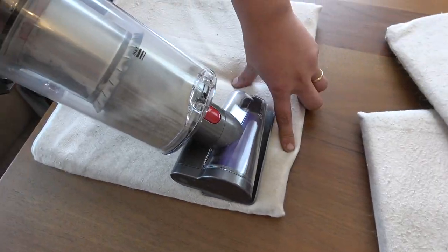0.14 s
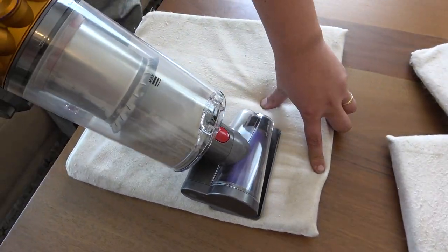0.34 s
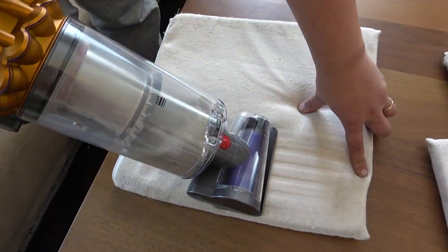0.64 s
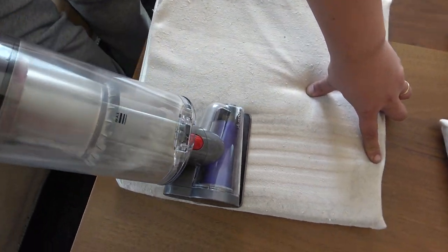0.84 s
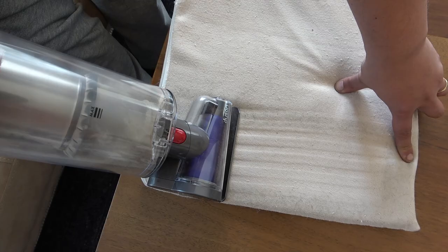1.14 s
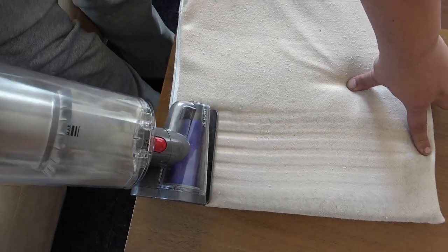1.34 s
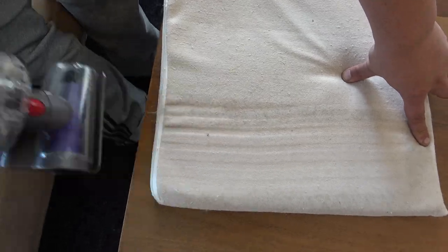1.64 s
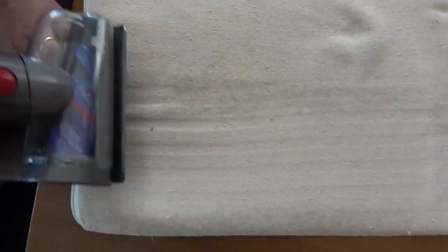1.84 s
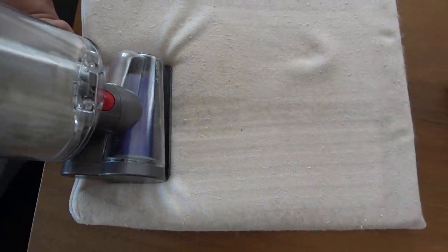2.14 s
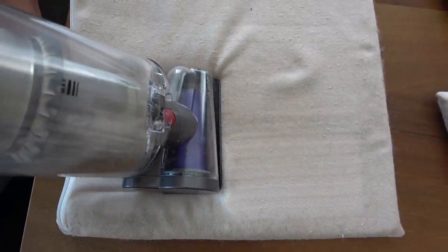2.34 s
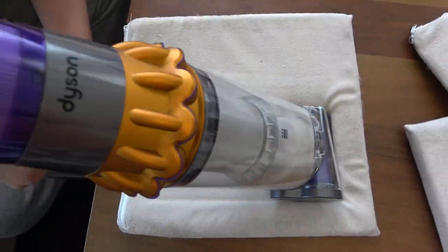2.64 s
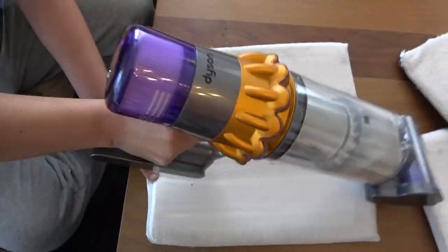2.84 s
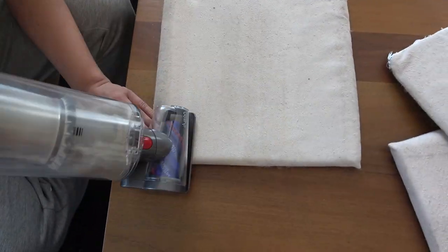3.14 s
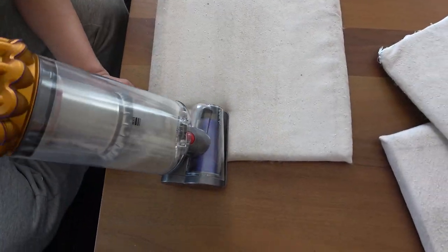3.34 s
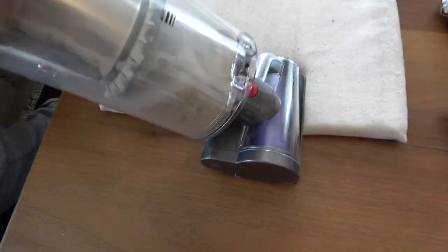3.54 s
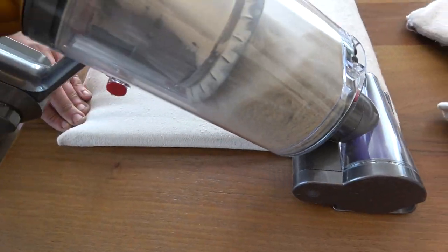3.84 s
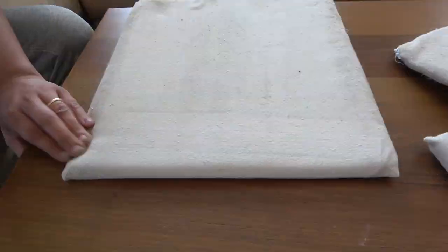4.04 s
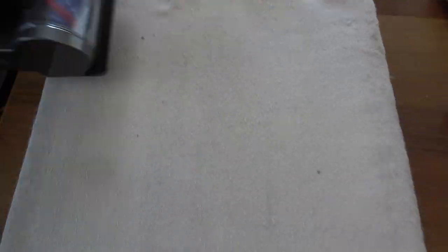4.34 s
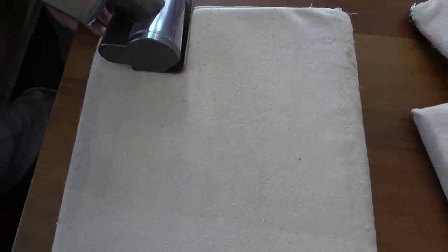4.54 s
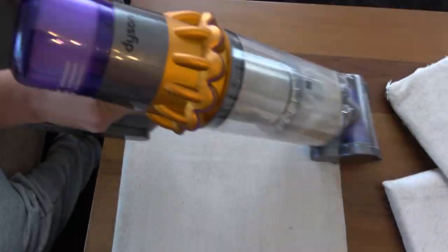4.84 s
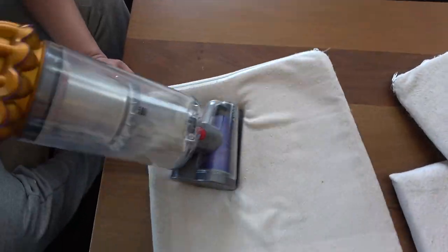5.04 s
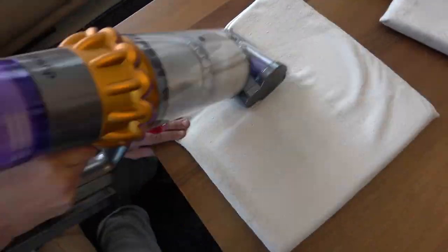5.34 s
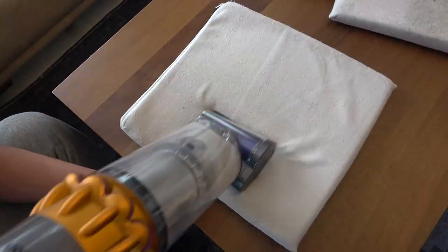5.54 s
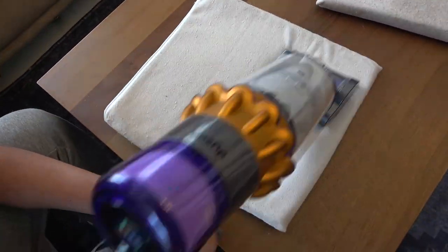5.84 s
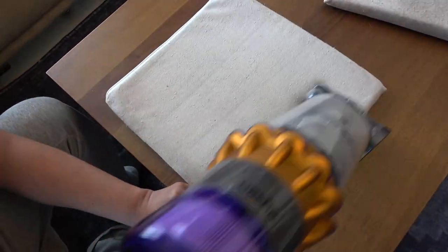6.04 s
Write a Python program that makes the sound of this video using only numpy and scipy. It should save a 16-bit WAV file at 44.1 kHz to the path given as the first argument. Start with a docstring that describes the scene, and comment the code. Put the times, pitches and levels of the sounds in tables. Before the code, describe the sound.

A cordless vacuum with a whining motorised brush drags over a cushion, cutting out and restarting three times, then works in short hissing strokes.

```python
"""A cordless vacuum with a small motorised brush head is drawn over a cushion on a table.
It is already running and makes a long drag, stops with a hollow ping, and starts again for a second long drag.
The second and third pulls of the trigger end in a ping too; the fourth brings six short strokes up to the end.
Air is coloured noise, hissing up as the head's seal opens; the fan whistle and brush whine are sine tones.
Ticks sound around the starts and stops, and two of grit during the second drag.
The brush hums faintly as it spins down, and a quiet room lies beneath."""
import sys
import numpy as np
from scipy import signal
from scipy.fft import rfft, irfft
from scipy.io import wavfile

SR = 44100
rng = np.random.default_rng(int(sys.argv[2]) if len(sys.argv) > 2 else 0)


def put_to_file(sound):
    """Save the sound as 16-bit audio at rate SR, in the file named by the first command-line argument."""
    columns = np.atleast_2d(sound).T  # one column per channel
    safe = np.clip(columns, -1, 1)
    whole_steps = np.round(safe * 32767)
    wavfile.write(sys.argv[1], SR, whole_steps.astype(np.int16))


N = 273420
TIME = np.arange(N) / SR
HZ = np.maximum(np.arange(N // 2 + 1) * SR / N, 1)
CUTOFF_HZ = 15780


def from_db(db):
    """Turn decibels into a gain."""
    return 10 ** (np.asarray(db) / 20)


def rms_one(x):
    """Scale a sound to an rms of 1."""
    return x / np.sqrt(np.mean(x ** 2) + 1e-20)


def in_time(rows):
    """Draw straight lines between (time, value) points, at every sample."""
    time_s, value = np.transpose(rows)
    return np.interp(TIME, time_s, value)


def by_hz(points):
    """Draw lines between (frequency, value) points, at every frequency bin."""
    hz, value = np.transpose(points)
    return np.interp(np.log(HZ), np.log(hz), value)


def drift(rate_hz):
    """Slow random wandering with an rms of 1, made by filtering noise."""
    spectrum = rfft(rng.standard_normal(N))
    return rms_one(irfft(spectrum / (1 + (HZ / rate_hz) ** 2), N))


def along_path(start_s, end_s):
    """Go from 0 at the start of an event to 1 at its end."""
    return np.clip((TIME - start_s) / (end_s - start_s), 0, 1)


def angle_of(hz):
    """Add up a changing frequency into the angle of a sine."""
    return 2 * np.pi * np.cumsum(hz) / SR


def bump(at_s, half_s):
    """A smooth swell of height 1."""
    return np.exp(-((TIME - at_s) / half_s) ** 2)


def pan(db):
    """Left and right gains; positive dB leans to the left."""
    return from_db(np.array([db, -db]) / 2)


# how alike noise is in the two ears: pitch_hz, likeness (0-1)
EAR_LIKENESS = [(60, .8), (300, .84), (1200, .97), (2800, .97), (4500, .91), (15000, .9)]


def stereo_noise(gain):
    """Coloured noise, nearly alike in both ears, with an rms of 1."""
    alike = np.clip(by_hz(EAR_LIKENESS), 0, 1)
    mid, side = rfft(rng.standard_normal((2, N)))
    shared = np.sqrt(1 + alike) * mid
    opposed = np.sqrt(1 - alike) * side * [[1], [-1]]
    return rms_one(irfft(gain * (shared + opposed), N))


# pulls of the trigger: on_s, off_s
TRIGGER_PULLS = [(-0.1, 1.727), (1.947, 2.921), (3.211, 4.026), (4.409, 6.3)]
START_S = .0042


def power(rise_s, brake_db_per_s):
    """The fan is up within milliseconds of a pull and is braked hard on release."""
    total = 0
    for on_s, off_s in TRIGGER_PULLS:
        start = (1 + np.tanh((TIME - on_s) / rise_s)) / 2
        brake = from_db(-brake_db_per_s * np.maximum(TIME - off_s, 0))
        total = total + start * brake
    return total


CONTACT_S = .011  # the head meets or leaves the cloth within about this time


def on_cloth(lands_s, lifts_s):
    """1 while the head lies on the cloth, 0 while it is in the air."""
    return (np.tanh((TIME - lands_s) / CONTACT_S) - np.tanh((TIME - lifts_s) / CONTACT_S)) / 2


# strokes on the cloth (where one runs into the next the head stays down); levels are before later changes:
# lands_s, lifts_s, seal (0-1), mid_speed (turns per s), slower_at_ends (turns per s; negative is faster),
# roar_db (body), rush_db (intake), fizz_db (exhaust), hum_db (motor), mesh_db (gears), whine_db (gears)
CLOTH_STROKES = [(-0.1, 0.33, 0.7, 428, -6, -39.5, -31, -35, -52, -32.5, -28.5),
                 (0.33, 0.8, .56, 428, 0, -40.3, -33, -33.5, -52.5, -31, -30),
                 (0.8, 1.594, 0.36, 428, 0, -37.5, -34.5, -35.3, -54.5, -27, -31),
                 (1.62, 1.755, 0.11, 488, 4, -33.5, -30.5, -28, -56, -43, -42.5),
                 (2.008, 2.085, 0.3, 455, 0, -37, -28.5, -31.5, -53, -44, -36.5),
                 (2.085, 2.55, .84, 430, -2, -42, -35.8, -34, -57, -37.5, -33.5),
                 (2.55, 2.85, 1.0, 440, 1.5, -41.5, -36, -33.5, -60, -30, -34),
                 (3.275, 3.935, 0.35, 471, 4, -35, -23.5, -28.5, -54.5, -35, -37),
                 (3.935, 4.06, 0, 376, -20, -37.5, -25, -26, -56.5, -52, -38),
                 (4.458, 4.875, 0.17, 467, 3, -39.5, -28, -28.3, -51, -50, -30),
                 (5.003, 5.22, 0.83, 445, 50, -40, -34, -33, -53.5, -33, -32.5),
                 (5.351, 5.462, .8, 460, 9, -41.5, -33, -32, -61, -32, -34),
                 (5.575, 5.695, 0.93, 454, 26, -39.7, -35.5, -30, -51, -33, -33.5),
                 (5.815, 5.925, 0.88, 448, 36, -39, -33.5, -31.3, -53.5, -28, -32),
                 (6.0, 6.144, 0.13, 466, 0, -35, -23.5, -28.5, -54.5, -31.5, -34)]
# head in the air, same levels: roar_db, rush_db, fizz_db, hum_db, mesh_db, whine_db
OPEN_HEAD_DB = [-38, -30.5, -27.5, -54.5, -52, -36.5]


def head():
    """Each stroke holds its own seal and levels; between strokes they return to those of the open head."""
    free = np.array([0, *OPEN_HEAD_DB])
    contacts = np.array([on_cloth(lands_s, lifts_s) for lands_s, lifts_s, *_ in CLOTH_STROKES])
    held = np.array([[seal, *levels] for _, _, seal, _, _, *levels in CLOTH_STROKES])
    return free[:, None] + (held - free).T @ contacts


# what a gust before a landing adds: roar_db, rush_db, hiss_db, fizz_db
LANDING_GUST_DB = [0.5, 3.6, 11.3, 0.46]
# what a gust after a lift adds: roar_db, rush_db, hiss_db, fizz_db
LIFT_GUST_DB = [3.7, 3.02, 8.1, 3.5]
# what the overshoot of air on each pull adds: roar_db, rush_db, hiss_db, fizz_db
PULL_SURGE_DB = [3.5, 7, 0, -1.5]
SURGE_S = 0.058  # the surge dies away over this time


def airflow(seal, roar_db, rush_db, fizz_db):
    """Air surges on each pull and squeezes through the narrow gap around landings and lifts."""
    hiss_db = -32.5 - 6 * seal  # the lip of the head hisses less when sealed
    steady = np.array([roar_db, rush_db, hiss_db, fizz_db])
    surge, landing, lifting, contact = 0, 0, 0, 0
    for on_s, _ in TRIGGER_PULLS:
        surge = surge + (TIME > on_s - START_S) * np.exp(-np.abs(TIME - on_s) / SURGE_S)
    for lands_s, lifts_s, tight, *_ in CLOTH_STROKES:
        contact = contact + on_cloth(lands_s, lifts_s)
        # a tighter seal gives a stronger landing gust
        landing = landing + np.sqrt(abs(tight)) * bump(lands_s - 0.035, half_s=0.033)
        lifting = lifting + bump(lifts_s + 0.014, half_s=0.017)
    gusts = np.outer(LANDING_GUST_DB, landing) + np.outer(LIFT_GUST_DB, lifting)
    return steady + np.outer(PULL_SURGE_DB, surge) + (1 - contact) * gusts


# broad colour of the air noise: pitch_hz, level_db (per Hz, relative)
AIR_SPECTRUM = [(30, -31.5), (100, -30), (250, -27), (450, -19.5), (680, -21), (1100, -8), (2200, -0.5),
                (3600, -4.5), (4600, 4), (6500, 4), (9500, 0), (12000, -0.5), (15500, -2)]
# hollows of head and bin that colour the air: pitch_hz, width_hz, boost_db
AIR_CAVITIES = [(576.7, 14, 14.5), (804, 104, 7), (1337, 41, 9), (1725, 53, 8), (3165, 50, 3.5),
                (4380, 200, -1)]


def air(flow_db, flutter_db, table_echo, echo_s):
    """Turbulence is noise in five bands, coloured by the cavities it passes and echoed off the table."""
    colour_db = by_hz(AIR_SPECTRUM)
    for hz, width_hz, boost_db in AIR_CAVITIES:
        colour_db = colour_db + boost_db / (1 + (2 * (HZ - hz) / width_hz) ** 2)
    colour = from_db(colour_db)
    roar_db, rush_db, hiss_db, fizz_db = flow_db
    # the upper part of the roar grows with the rush at the intake
    upper_roar_db = roar_db - 2.5 + 0.13 * (rush_db - roar_db - 10.0)
    levels = [roar_db - 3.5, upper_roar_db, rush_db, hiss_db, fizz_db]
    edges_hz = [1, 2100, 3800, 7300, 10300, 20000]
    leans_db = [0, 0, 0, 0, 1]  # the exhaust blows to the left
    out = 0
    for low, high, level_db, lean_db in zip(edges_hz, edges_hz[1:], levels, leans_db):
        walls = (1 + (low / HZ) ** 16) * (1 + (HZ / high) ** 16) * (1 + (HZ / CUTOFF_HZ) ** 80)
        noise = stereo_noise(colour * walls ** -.5)
        out = out + from_db(level_db + flutter_db * drift(29)) * noise * pan(lean_db)[:, None]
    # the delay of the table echo wanders
    late = TIME - echo_s * (1 + 0.11 * drift(1.27))
    return out + table_echo * np.array([np.interp(late, TIME, side) for side in out])


# hisses and howls of air at the gap, and two rough motor tones of the brush (near 1.6 and 3.7 kHz),
# level before the trim: start_s, end_s, start_hz, end_hz, width_hz, level_db
ROUGH_BANDS = [(1.618, 1.7, 8200, 9080, 900, -24.5), (1.66, 1.752, 4260, 4950, 600, -29),
               (1.933, 2.072, 6160, 4990, 1500, -29.5), (1.947, 2.955, 4620, 4715, 400, -37.5),
               (3.192, 3.378, 8220, 7900, 1600, -25), (3.4, 4.049, 3896, 3108, 910, -36.5),
               (3.449, 4.049, 6615, 6320, 1200, -30), (3.969, 4.004, 1490, 1690, 59.6, -36.5),
               (4.527, 4.784, 3720, 3670, 70, -40), (4.872, 4.92, 8500, 8500, 1600, -27),
               (4.924, 5.008, 7110, 8880, 1500, -28.5), (5.275, 5.355, 7500, 8200, 2500, -26.5),
               (5.766, 5.826, 10540, 8800, 1400, -26.5), (6.14, 6.222, 8020, 10420, 1400, -26)]


def howls_and_rough_tones(trim_db):
    """Narrow bands of noise, most of them gliding: air at the gap, and two rough motor tones of the brush."""
    out = np.zeros((2, N))
    for start_s, end_s, start_hz, end_hz, width_hz, level_db in ROUGH_BANDS:
        along = along_path(start_s, end_s)
        low_pass = signal.butter(2, width_hz / 2, fs=SR, output="sos")
        slow_noise = signal.sosfilt(low_pass, rng.standard_normal((2, N)))
        # slow noise riding on a tone becomes a narrow band around it
        phase = angle_of(start_hz + (end_hz - start_hz) * along)
        band = rms_one(slow_noise[0] * np.cos(phase) + slow_noise[1] * np.sin(phase))
        out += from_db(level_db + trim_db) * np.sqrt(4 * along * (1 - along)) * band
    return out


# the hand's pressure steers the brush through each long drag: time_s, speed (turns per s)
FIRST_DRAG_SPEED = [(0.0, 423.7), (0.056, 418.1), (0.154, 429.7), (0.602, 426.6), (0.698, 419.3),
                    (0.862, 430.1), (0.92, 425.8), (1.03, 433.7), (1.16, 431.4), (1.416, 442.4),
                    (1.442, 440.7), (1.464, 426.3), (1.54, 427.5), (1.59, 410.7)]
SECOND_DRAG_SPEED = [(2.06, 448.8), (2.086, 439.6), (2.156, 439.1), (2.266, 454.7), (2.774, 459.4),
                     (2.818, 456.4), (2.85, 448.0)]
FREE_SPEED = 494  # turns per s with the head in the air


def brush_speed():
    """Each stroke on the cloth changes the brush speed; the hand's pressure sets it in the long drags."""
    speed = np.full(N, float(FREE_SPEED))
    for lands_s, lifts_s, _, mid_speed, slower_at_ends, *_ in CLOTH_STROKES:
        from_middle = 2 * along_path(lands_s, lifts_s) - 1
        stroke_speed = mid_speed - slower_at_ends * from_middle ** 2
        speed += on_cloth(lands_s, lifts_s) * (stroke_speed - FREE_SPEED)
    for drag in FIRST_DRAG_SPEED, SECOND_DRAG_SPEED:
        held = on_cloth(drag[0][0] - CONTACT_S, drag[-1][0] + CONTACT_S)
        speed += held * (in_time(drag) - speed)
    return speed


# tones in one turn of the brush motor: order (multiple of its speed), level_db (added to what drives it)
MOTOR_TONES = [(1, -15), (3, -2.5), (4, 0.5), (6, -4.5), (7, -4.5), (8, -3.5), (19, -6), (20, -12),
               (21, -5.5), (22, -11), (23, -2.5), (24, -6.5), (25, -5), (26, -10.5), (28, -19), (29, -26)]
# singing of the drive belt: time_s, level_db
BELT_LEVEL = [(2.1, -51), (2.23, -44), (2.75, -47.5), (2.9, -60), (4.4, -80), (4.65, -53), (5.0, -53)]
# whistle of the gear teeth: time_s, level_db
GEAR_WHISTLE = [(0.0, -24), (0.072, -33), (0.406, -23), (0.642, -32), (0.684, -26), (0.822, -30),
                (0.854, -25), (1.298, -25), (1.312, -33), (1.438, -39), (1.464, -24), (1.586, -25),
                (1.66, -45)]
# the hum fades and flutters with brush speed: speed (turns per s), change_db, flutter_db
HUM_BY_SPEED = [(400, -2, 3), (425, 0, 1), (460, 0, 1), (475, -2, 3), (495, -4, 4)]
TEETH, BELT_ORDER = 18, 3.6  # tones per turn of the gear mesh and the belt
BUZZ_SPEED = 432  # turns per s at which the head's shell buzzes most


def brush(hum_db, mesh_db, whine_db, jitter, shimmer_db, wander_db, eccentric):
    """Motor, gears and belt are sines at multiples of brush speed; returns the whine and the whistle."""
    speed = brush_speed()
    buzz_db = -45.2 - .2 * np.abs(speed - BUZZ_SPEED)
    speeds, change_db, flutter_db = np.transpose(HUM_BY_SPEED)
    hum_change_db = np.interp(speed, speeds, change_db)
    hum_db = hum_db + hum_change_db + np.interp(speed, speeds, flutter_db) * drift(25)
    angle = angle_of(speed * (1 + jitter * drift(62.7)))

    def partial(order, db):
        """One shimmering sine at a multiple of the brush speed."""
        start = rng.uniform(0, 2 * np.pi)
        return np.sqrt(2) * from_db(db + shimmer_db * drift(34)) * np.sin(order * angle + start)

    whine = partial(2, hum_db) + partial(TEETH, mesh_db) + partial(BELT_ORDER, in_time(BELT_LEVEL))
    for order, level_db in MOTOR_TONES:
        if order < 5:
            drive_db = hum_db
        elif order < 10:
            drive_db = buzz_db  # from the shell
        else:
            drive_db = whine_db  # from unevenness of the gears
        # each tone swells and fades on its own
        whine += partial(order, level_db + drive_db + wander_db * drift(3.1))
    # a slightly eccentric pinion swells once a turn
    whistle = partial(2 * TEETH, in_time(GEAR_WHISTLE)) * (1 + eccentric * np.cos(angle))
    return whine, whistle


# blade tone as the machine is turned about: time_s, change_db
FAN_TURNING = [(0.1, 1), (0.65, 5.5), (1.3, -0.5), (2.2, -5.5), (2.7, 1.5), (3.35, 2), (3.75, -6),
               (4.45, -0.5), (5.1, 2), (6.2, 3)]
FAN_LAG_S = 0.054  # the fan follows the seal with this lag


def fan(seal, jitter_hz, shimmer_db):
    """The blade tone of the fan is a very high sine that rises when the head seals."""
    r = np.exp(-1 / (FAN_LAG_S * SR))
    suction, _ = signal.lfilter([1 - r], [1, -r], seal, zi=[r * seal[0]])
    phase = angle_of(14335 + 310 * suction + jitter_hz * drift(70))
    # open level, then louder as the head seals
    level_db = -37.6 + 11 * (seal + suction) / 2
    level_db = level_db + in_time(FAN_TURNING) + shimmer_db * drift(30)
    return np.sqrt(2) * from_db(level_db) * np.sin(phase)


# plastic ticks of trigger, valve and grit: time_s, peak_db, ring_hz
PLASTIC_TICKS = [(1.797, -39, 2500), (1.904, -37, 6000), (2.398, -27, 3000), (2.449, -31, 3000),
                 (2.95, -29, 6980), (3.138, -34.5, 6010), (3.155, -44, 7000), (3.197, -39, 8470),
                 (3.203, -34, 7000), (4.058, -34, 7500), (4.335, -52, 1200), (4.363, -43, 1600),
                 (4.394, -36, 7000), (4.400, -20.5, 7600)]


def ticks(t60_s, width):
    """Each tick is a brief crack of noise through a broad resonance of the plastic."""
    out = np.zeros(N)
    age = np.arange(SR // 20) / SR
    for time_s, peak_db, ring_hz in PLASTIC_TICKS:
        r = np.exp(-np.pi * width * ring_hz / SR)
        ring = [1, -2 * r * np.cos(2 * np.pi * ring_hz / SR), r * r]
        burst = rng.standard_normal(len(age)) * from_db(-60 * age / t60_s)
        crack = signal.lfilter([1, 0, -1], ring, burst)
        out[round(time_s * SR):][:len(age)] += from_db(peak_db) * crack / np.abs(crack).max()
    return out


# the bin pings as the suction lets go: time_s, peak_db, pitch_hz
BIN_PINGS = [(1.722, -50, 585), (1.756, -42, 1197), (2.954, -43, 1197), (4.061, -47, 1197)]


def pings(bend, settle_s, t60_s, attack_s):
    """The air in the bin rings as a fading sine, its pitch bending up as the pressure returns."""
    out = 0
    for time_s, peak_db, pitch_hz in BIN_PINGS:
        age = np.maximum(TIME - time_s, 0)
        phase = angle_of(pitch_hz * (1 - bend * np.exp(-age / settle_s)))
        attack = 1 - np.exp(-age / attack_s)
        out = out + from_db(peak_db - 60 * age / t60_s) * attack * np.sin(phase)
    return out


# the brush spins down between pulls: start_s, end_s, start_hz, end_hz, level_db
SPIN_DOWNS = [(1.74, 1.95, 436, 323, -64.5), (2.97, 3.21, 342, 326.7, -70)]


def coasting(waver_db):
    """The freewheeling brush leaves a faint sine that falls in pitch."""
    out = 0
    for start_s, end_s, start_hz, end_hz, level_db in SPIN_DOWNS:
        along = along_path(start_s, end_s)
        phase = angle_of(start_hz + (end_hz - start_hz) * along ** 2)
        swell = np.sqrt(4 * along * (1 - along))
        out = out + from_db(level_db + waver_db * drift(16)) * swell * np.sin(phase)
    return out


def room(x, t60_s, dull_hz):
    """A furnished room adds a short, dull tail of decaying noise, different in each ear."""
    age = np.arange(SR // 2) / SR
    tail = rng.standard_normal((2, len(age))) * from_db(-60 * age / t60_s) * (age > .004)
    r = np.exp(-2 * np.pi * dull_hz / SR)
    tail = signal.lfilter([1 - r], [1, -r], tail / np.sqrt(np.sum(tail[0] ** 2)))
    return signal.fftconvolve(x, tail, axes=1)[:, :N]


# colour of the quiet room: pitch_hz, level_db (per Hz, relative)
ROOM_COLOUR = [(18, -61.5), (30, -31), (202, -15.5), (307, -7), (399, -15), (443, -2), (691, -9.5),
               (830, -1), (2830, -11), (11000, -11.5), (15500, -19.5)]
# the room's hiss rises and dips a little: time_s, change_db
ROOM_CHANGE = [(1.85, 5), (3.05, 2), (4.1, -5), (4.2, -5), (4.3, 1.5)]


def room_hiss(level_db):
    """The quiet room is steady coloured noise whose level shifts slightly."""
    return from_db(level_db + in_time(ROOM_CHANGE)) * stereo_noise(from_db(by_hz(ROOM_COLOUR)))


# where the tool is: time_s, lean_db (left over right)
TOOL_SIDE = [(0.0, -0.5), (0.4, -0.5), (2.28, 5.5), (2.92, -4), (2.97, 5), (3.16, 1.5), (4.04, -2.5),
             (4.09, 10), (4.49, 3), (4.92, -2), (4.96, 2.5), (6.03, -1.5), (6.13, -1), (6.2, -0.5)]


def scene():
    """Add up the running machine, its small noises and the room."""
    lean_db = in_time(TOOL_SIDE)
    seal, roar_db, rush_db, fizz_db, hum_db, mesh_db, whine_db = head()
    whine, whistle = brush(hum_db, mesh_db - 4.0, whine_db - 3.0, jitter=0.001423,
                           shimmer_db=1.5, wander_db=1.4, eccentric=.3)
    blade_tone = fan(seal, jitter_hz=15, shimmer_db=1.0)
    # the shrill tones beam, so each has its own lean
    shrill = whistle * pan(4 + .7 * lean_db) + blade_tone * pan(7.5 + 1.6 * lean_db)
    flow_db = airflow(seal, roar_db, rush_db, fizz_db)
    rush = from_db(-1.4) * air(flow_db, flutter_db=1.14, table_echo=0.29, echo_s=.0014)
    rough = howls_and_rough_tones(trim_db=-.5)
    running = power(rise_s=START_S, brake_db_per_s=738)
    machine = running * ((rush + rough + whine) * pan(lean_db) + shrill)
    small_noises = ticks(t60_s=0.0078, width=.8) + coasting(waver_db=5.0)
    small_noises = small_noises + pings(bend=0.13, settle_s=.011, t60_s=.39, attack_s=0.0006)
    direct = machine + small_noises
    echoes = from_db(-30.5) * room(direct, t60_s=0.31, dull_hz=3000)
    return direct + echoes + room_hiss(level_db=-62.5)


def record(dry):
    """A steep low-pass filter cuts the very top."""
    return signal.sosfilt(signal.ellip(12, .1, 80, CUTOFF_HZ, fs=SR, output="sos"), dry)


dry = scene()
out = record(dry)
put_to_file(out)
```